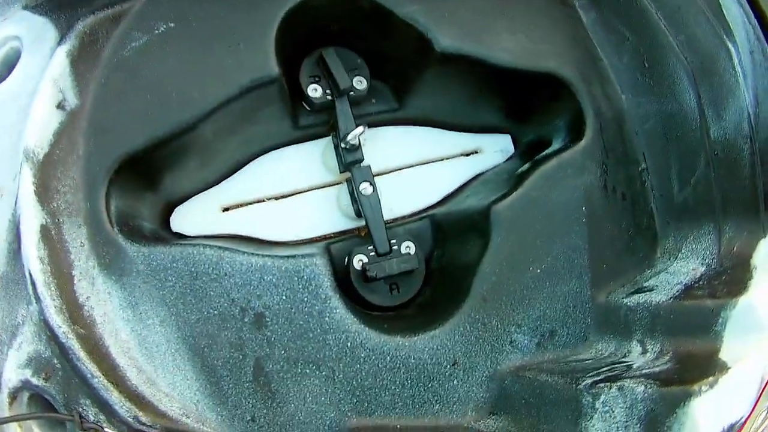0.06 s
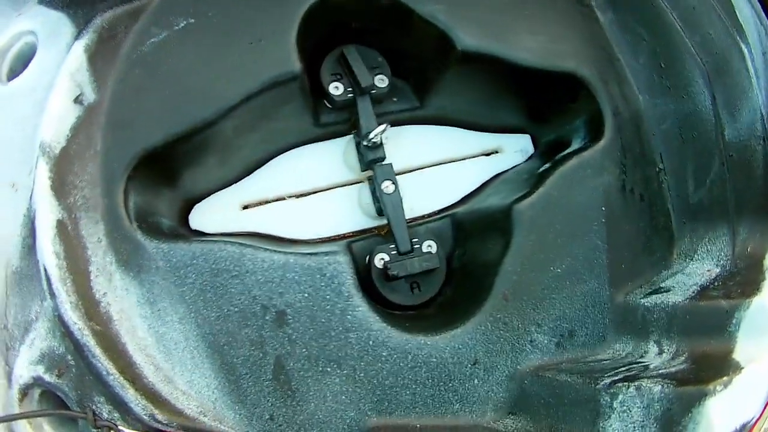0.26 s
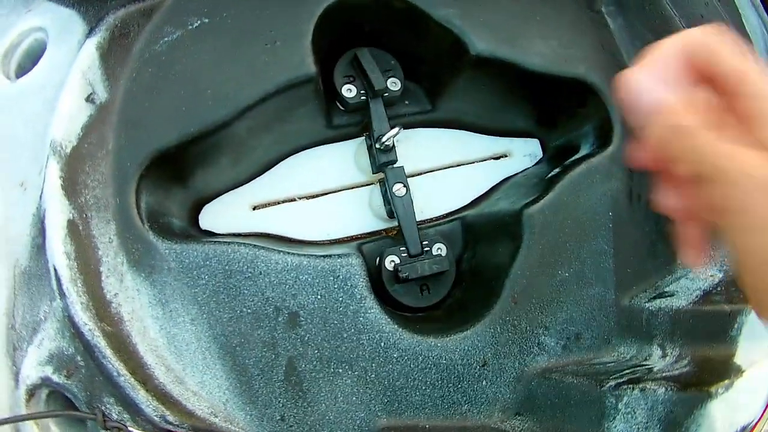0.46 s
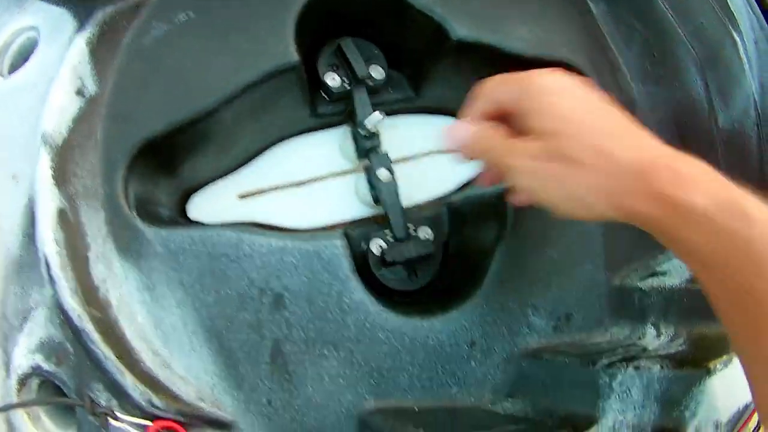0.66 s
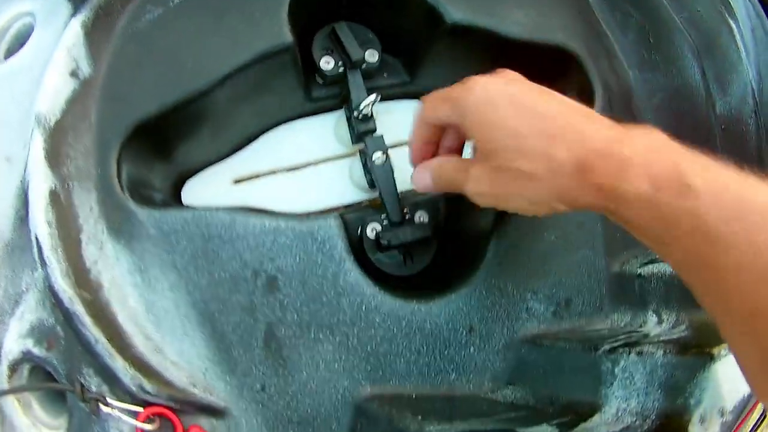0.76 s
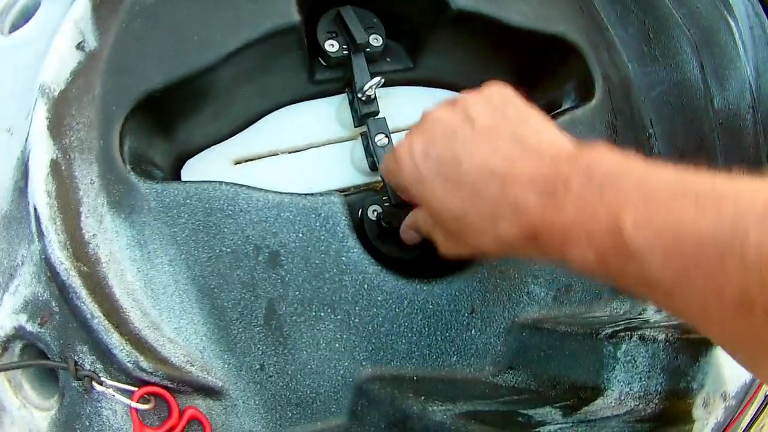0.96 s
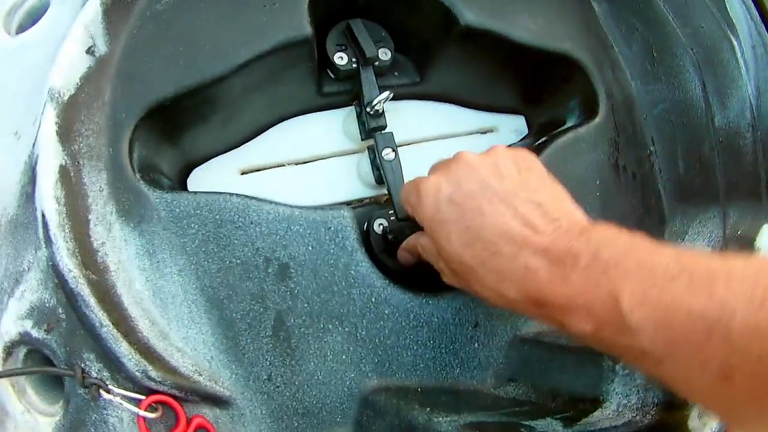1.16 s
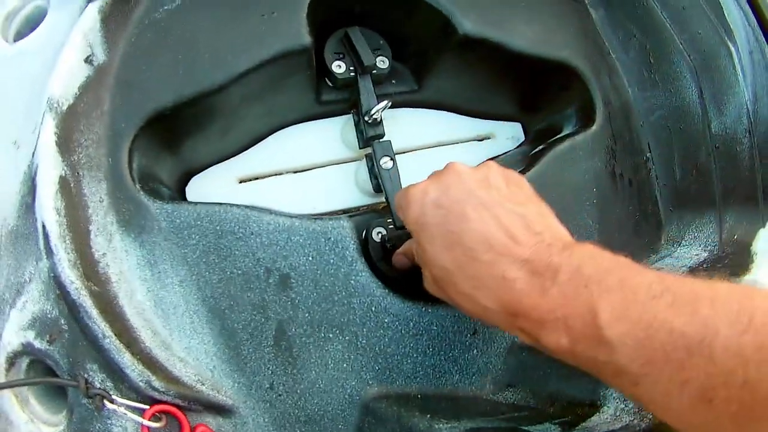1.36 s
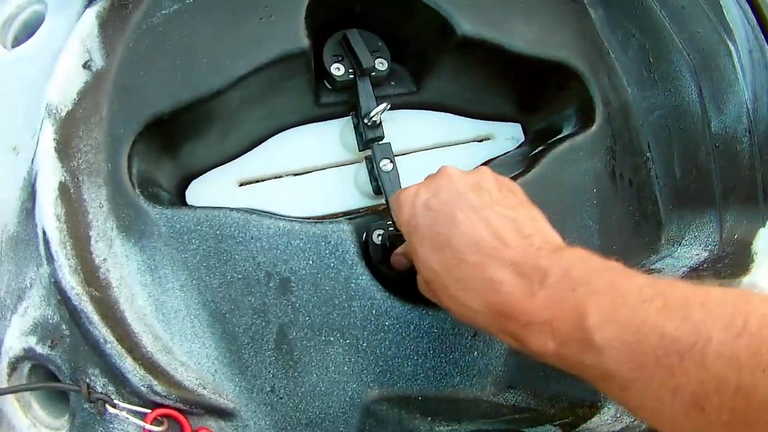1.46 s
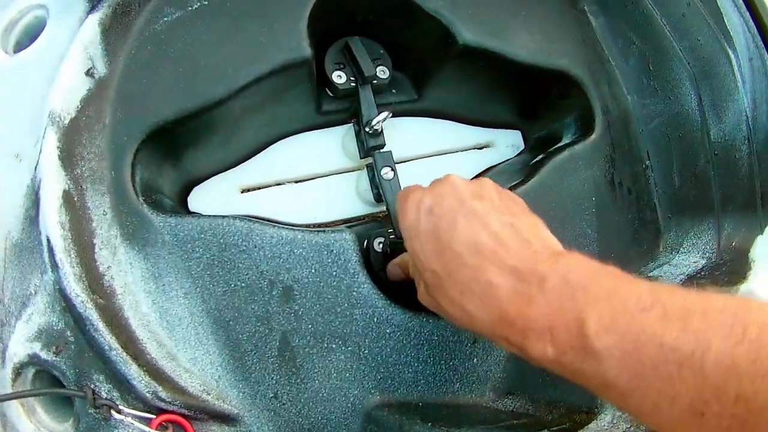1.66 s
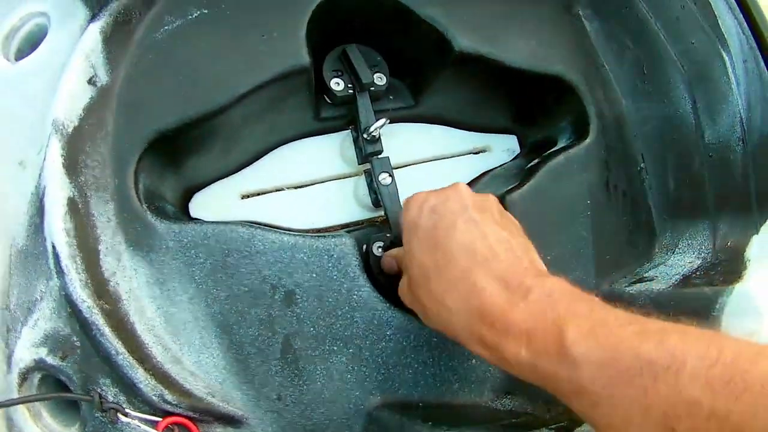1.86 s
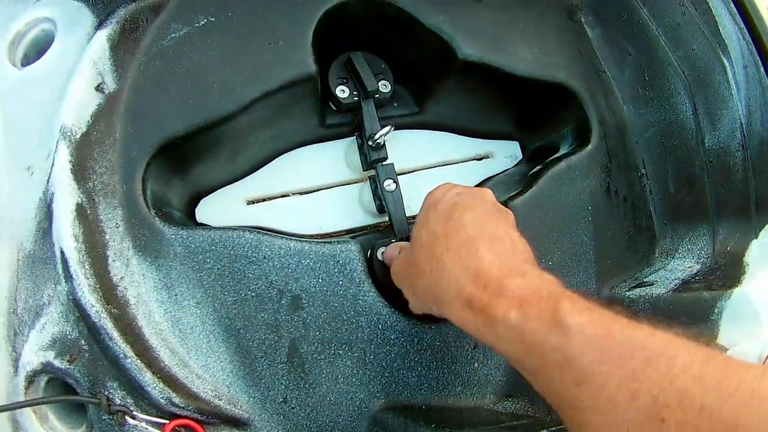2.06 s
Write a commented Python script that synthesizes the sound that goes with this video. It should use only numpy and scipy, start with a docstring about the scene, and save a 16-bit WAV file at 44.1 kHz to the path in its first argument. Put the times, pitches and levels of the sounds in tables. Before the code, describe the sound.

A plastic clamp arm snaps shut loudly up close, then dull hollow latch knocks over faint hum

```python
"""A hinged plastic clamp arm snaps shut close to a small microphone, overloading it, and bounces ever weaker.
Arm and hard catch are decaying modes set off by short pushes, cut short as the seat damps them.
Soft taps before and after ring the hollow recess under the arm. Later a hand works the latch: dull knocks
and a rattle ring the hollow hull, each with a short noise scrape.
Beneath lie a steady two-partial motor hum and a wash of outdoor noise, shaped from coloured noise."""
import sys
import numpy as np
from scipy import signal
from scipy.fft import rfft, irfft
from scipy.io import wavfile
from scipy.ndimage import uniform_filter1d

SR = 44100
rng = np.random.default_rng(int(sys.argv[2]) if len(sys.argv) > 2 else 0)


def digitize_waveform(pressure):
    """Quantize a signal to 16-bit integers and store it at the path in sys.argv[1].

    Rows of a 2-D input are taken as channels; values are limited to [-1, 1].
    """
    field = np.atleast_2d(pressure).T
    bounded = np.clip(field, -1, 1)
    quanta = np.round(bounded * 32767).astype(np.int16)
    wavfile.write(sys.argv[1], SR, quanta)


N = 92610  # samples, 2.1 s

RING_SIZE = 6000  # samples in each struck sound
ARM_RISE, HOLLOW_RISE = 0.716, 0.217  # build-up time constant of a mode, in cycles
SEATED_DB, SEAT_S = -21.5, 0.00073  # how far and how fast the seat damps the arm
SCATTER_DB = 2.78  # spread of mode strength from knock to knock
CRACK_DB, CRACK_S = -16, 0.00265  # scrape: gain relative to its knock, time to its peak
BASS_HZ, MID_HZ, TREBLE_HZ = 250, 550, 2500  # corners of the knock colour
WAVER_HZ, WAVER_DB = .3, 0.4  # drift of the hum in pitch and level
WASH_DB = -45.5  # level of the wash before its slow level curve
SWELL_DB, FLICKER_DB = -1.0444, 0.9267  # drift of the whole wash, and of each octave band alone
SMALL_HZ = 113  # struck parts radiate little below this
DRIVE = 0.717  # how hard the input stage is driven
TOP_HZ = 15300


def undb(db):
    """dB to gain."""
    return 10 ** (np.asarray(db, float) / 20)


def walk(rate):
    """Slow random drift with a spread near 1, taking about rate new values a second."""
    hold = int(SR / rate)
    steps = np.repeat(rng.standard_normal(N // hold + 1), hold)
    smooth = uniform_filter1d(uniform_filter1d(steps, hold), hold)
    return 1.3 * smooth[:N]  # make up for the smoothing


def ring(modes, gain_db, contact_ms, rise):
    """Modes that build up over part of a cycle and decay, set off by a half-sine push."""
    hz, db, t60 = np.array(modes).T[:, :, None]
    t = np.arange(RING_SIZE) / SR
    build_up = 1 - np.exp(-t * hz / rise)
    decay = np.exp(-np.log(1000) * t / t60)
    tones = undb(db + gain_db) * np.sin(2 * np.pi * hz * t)
    body = np.sum(tones * build_up * decay, axis=0)
    push = np.sin(np.pi * np.clip(t[:200] * 1000 / max(contact_ms, .05), 0, 1))
    return np.convolve(body, push / push.sum())[:RING_SIZE]


def add(out, start_s, sound):
    """Mix a sound in at its start time."""
    i = int(start_s * SR)
    out[i:i + len(sound)] += sound[:N - i]


def hum():
    """A motor tone with its second harmonic, wavering a little in pitch and level."""
    # Course of the hum. Each row: time in seconds, pitch in Hz, fundamental in dB, second harmonic in dB.
    course = [(0, 83.33, -41.5, -59.5), (.5, 83.31, -42, -53), (1., 82.78, -42.5, -57),
              (1.5, 82.13, -42, -53.5), (1.8, 81.8, -40.5, -49), (2.1, 81.76, -40, -52)]
    s, hz, db, second_db = np.array(course).T
    t = np.arange(N) / SR
    pitch = np.interp(t, s, hz) + WAVER_HZ * walk(9)
    phase = 2 * np.pi * np.cumsum(pitch) / SR
    tone = undb(np.interp(t, s, db)) * np.sin(phase)
    tone += undb(np.interp(t, s, second_db)) * np.sin(2 * phase)
    return np.sqrt(2) * tone * undb(WAVER_DB * walk(20))  # root 2 makes the table levels RMS


def wash():
    """Outdoor noise coloured by a spectrum; its octave bands swell together and flicker alone."""
    # Colour of the wash. Each row: frequency in Hz, relative density in dB per Hz.
    colour = [(15, -27), (25, -16), (50, -16), (70, -10.5), (95, -14), (120, -10), (155, -10), (270, -11),
              (388, -21.5), (490, -20), (620, -22), (800, -22.5), (910, -25), (1180, -23), (1420, -23.5),
              (1960, -32), (2280, -35), (3070, -43.5), (4410, -44), (7670, -62.5), (15500, -63)]
    # Slow level curve. Each row: time in seconds, level relative to WASH_DB in dB.
    level = [(0, 3), (.2, 1.), (.5, 0.5), (0.899, 1.17), (1.301, 0.), (1.7, -0.41), (2.1, -0.5)]
    hz, density_db = np.array(colour).T
    octave = np.log2(np.maximum(np.arange(N // 2 + 1) * SR / N, 1))
    spectrum = rfft(rng.standard_normal(N)) * undb(np.interp(octave, np.log2(hz), density_db))
    noise = np.zeros(N)
    for centre in range(4, 15):  # overlapping octave bands, 16 Hz to 16 kHz
        band = irfft(spectrum * np.clip(1 - abs(octave - centre), 0, 1), N)
        noise += band * undb(FLICKER_DB * walk(12))
    s, db = np.array(level).T
    curve_db = np.interp(np.arange(N) / SR, s, db)
    return noise / noise.std() * undb(WASH_DB + curve_db + SWELL_DB * walk(2.8))


def recess():
    """The snap and light taps ring the hollow under the arm as a set of decaying modes."""
    # Modes of the recess. Each row: frequency in Hz, strength in dB, t60 in seconds.
    recess_modes = [(640, -11.5, 0.034), (767.6, 0.5, 0.0406), (1273, -11.5, 0.029), (2647, -9.5, 0.017),
                    (4390, -18, 0.017), (6270, -20.5, 0.021)]
    # Taps. Each row: start in seconds, level in dB, contact in ms.
    taps = [(.012, -36, 1.1), (.058, -40, 1.1), (.077, -31, 1.17), (.18, -36.5, .9), (.2218, -25, 0.064),
            (.2755, -38, 0.53), (.548, -35, 1.06), (.735, -40, 0.86), (.797, -34.5, 0.25),
            (.876, -27, 0.835)]
    out = np.zeros(N)
    for s, db, contact_ms in taps:
        add(out, s, ring(recess_modes, db, contact_ms, HOLLOW_RISE))
    return out


def arm():
    """Each blow on the arm or tick of its catch rings freely until the seat damps it."""
    # Modes of the arm's body. Each row: frequency in Hz, strength in dB, t60 in seconds.
    arm_modes = [(168, -12, 0.01674), (444.2, -14, 0.023), (786.4, -0.46, 0.00782), (1408.5, 3, 0.00462),
                 (2229, -16, 0.03)]
    # Blows on the arm. Each row: start in seconds, level in dB, contact in ms, free ringing in seconds.
    blows = [(.21936, 12, 0.4586, .00233), (.2626, -14, 0.677, .002), (.2746, -16, 0.537, 0.00364),
             (0.2833, -27, 0.287, 0.0033)]
    # Modes of the hard catch. Each row: frequency in Hz, strength in dB, t60 in seconds.
    catch_modes = [(2451, 2.05, 0.00381), (3486, -1.5, 0.00438), (4736, -0.8, 0.00337), (5700, -13, 0.01),
                   (8097, -16, 0.0045), (11825, -6, 0.005), (14445, -18.5, .0041)]
    # Ticks of the catch. Each row: start in seconds, level in dB, contact in ms, free ringing in seconds,
    # extra gain of the lowest mode in dB.
    ticks = [(.21982, 4, 0.1166, 0.00077, 0.), (0.2619, -27, 0.233, 0.00078, -8),
             (.2622, -15, .22, .0012, -14), (.2743, -27, .19, .001, -10), (1.4245, -40, 0.156, .002, -5)]
    out, t = np.zeros(N), np.arange(RING_SIZE) / SR

    def seat(free_s):
        """Gain that stays open, then falls to the seated level."""
        return undb(SEATED_DB * np.clip((t - free_s) / SEAT_S, 0, 1))

    for s, db, contact_ms, free_s in blows:
        add(out, s, ring(arm_modes, db, contact_ms, ARM_RISE) * seat(free_s))
    lowest = (np.arange(len(catch_modes)) == 0)[:, None]
    for s, db, contact_ms, free_s, low_db in ticks:
        add(out, s, ring(catch_modes, db + low_db * lowest, contact_ms, ARM_RISE) * seat(free_s))
    return out


def hull():
    """Knocks ring the hull modes, each from a slightly different spot, with a short scrape."""
    # Modes of the hollow hull. Each row: frequency in Hz, strength in dB, t60 in seconds.
    hull_modes = [(161, -16.5, 0.033), (200, 5, 0.0359), (332, -13, 0.056), (444.4, -12.5, 0.0654),
                  (515, -5, 0.036), (622.3, -7, 0.0293), (850, -8.5, 0.0225), (1036, -12, 0.032),
                  (1161.7, -7.5, 0.0235), (1413, -10.5, 0.03), (1573.3, -9, 0.032), (1709, -12.5, 0.0184),
                  (2021, -30, .018), (2416, -20.5, 0.016), (2789, -17, 0.038), (3670, -35.5, 0.0069)]
    # Knocks. Each row: start in seconds, level in dB, contact in ms, bass gain in dB, treble gain in dB.
    knocks = [(1.4195, -32.5, 0.111, -6.5, -5.5), (1.4212, -24, 0.377, 9, 2.5),
              (1.4248, -24.5, 0.109, -7, -4.5), (1.443, -30.5, 0.36, 1, 3),
              (1.467, -33.5, 0.246, 5.5, -1.5), (1.496, -40.5, .25, 2.5, 0.5),
              (1.5295, -25, 0.17, 4.5, 0.5), (1.802, -29, .2, -6., 5.), (1.804, -27, 0.26, 4, -4.5),
              (1.8078, -20, 0.257, -3, -2), (1.8115, -28.5, 0.56, 1.5, 0.5),
              (1.815, -27.5, 0.58, -2.5, 8.5), (1.8215, -31, 0.7, 3., -4), (1.8245, -31.5, 0.15, 0.5, 6),
              (1.839, -34, 0.26, -1.5, -3), (1.961, -47, 0.095, -3, 15)]
    out = np.zeros(N)
    octave = np.log2(np.array(hull_modes)[:, :1])
    corners = np.log2([BASS_HZ, MID_HZ, TREBLE_HZ])
    spot = rng.standard_normal((len(knocks), len(hull_modes), 1))
    band = signal.butter(4, [600, 2800], "band", fs=SR, output="sos")
    scrape = signal.sosfilt(band, rng.standard_normal((len(knocks), 1000)))
    t = np.arange(scrape.shape[1]) / SR / CRACK_S
    scrape_env = t * np.exp(1 - t)  # peaks at 1
    for k, (s, db, contact_ms, bass_db, treble_db) in enumerate(knocks):
        colour_db = np.interp(octave, corners, [bass_db, 0, treble_db])
        add(out, s, ring(hull_modes, db + colour_db + SCATTER_DB * spot[k], contact_ms, HOLLOW_RISE))
        add(out, s, undb(db + CRACK_DB) * scrape[k] * scrape_env)
    return out


def scene():
    """Everything at one microphone, the struck parts thinned in the deep bass."""
    thin = signal.butter(2, SMALL_HZ, "high", fs=SR, output="sos")
    hits = signal.sosfilt(thin, arm() + recess() + hull())
    return (hits + hum() + wash())[None]


def record(dry):
    """The input stage rounds off loud peaks such as the snap; a steep low-pass cuts the top."""
    rounded = np.tanh(DRIVE * dry) / DRIVE
    low_pass = signal.ellip(8, .2, 70, TOP_HZ, fs=SR, output="sos")
    return signal.sosfilt(low_pass, rounded)


dry = scene()
out = record(dry)
digitize_waveform(out)
```